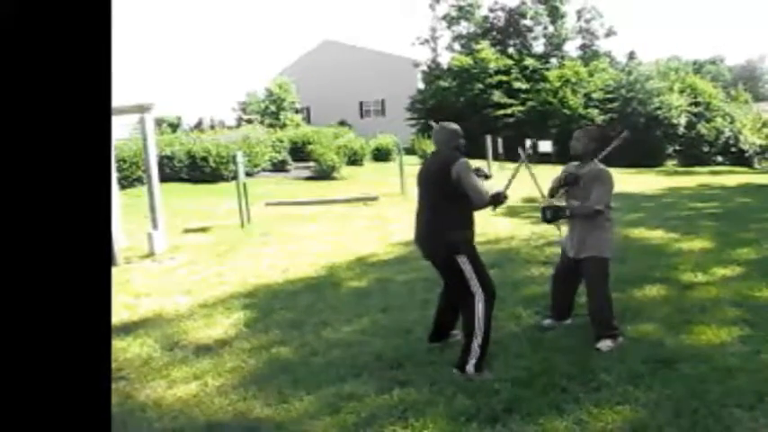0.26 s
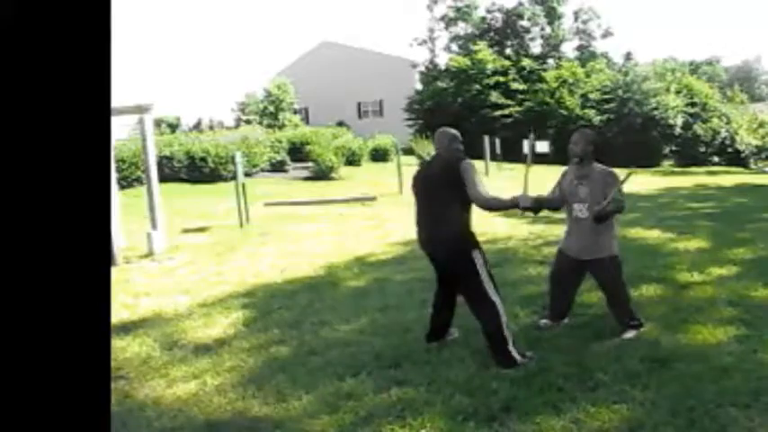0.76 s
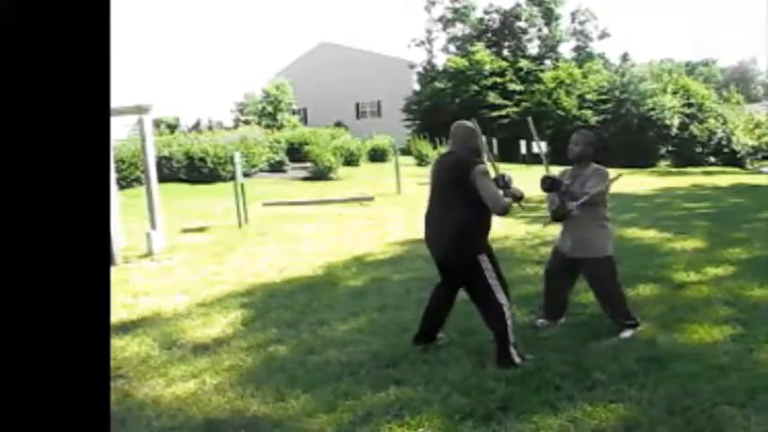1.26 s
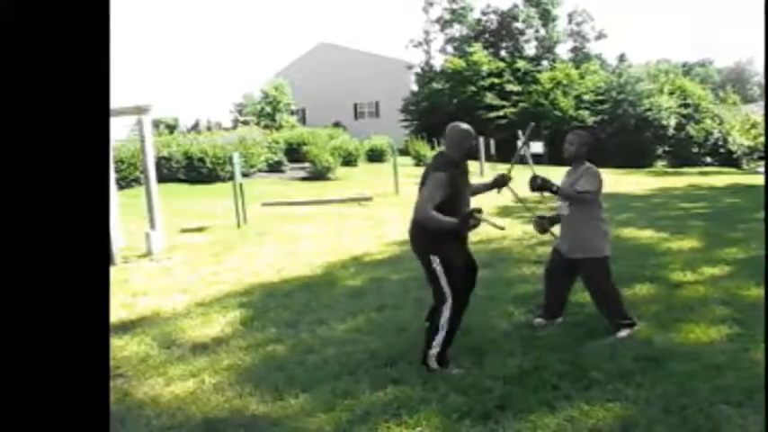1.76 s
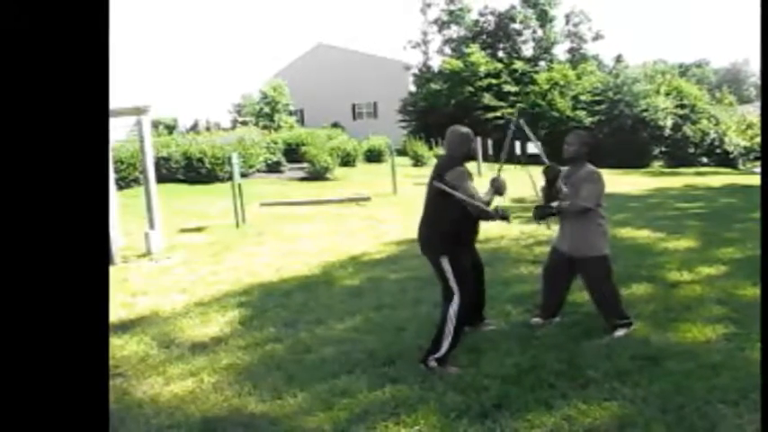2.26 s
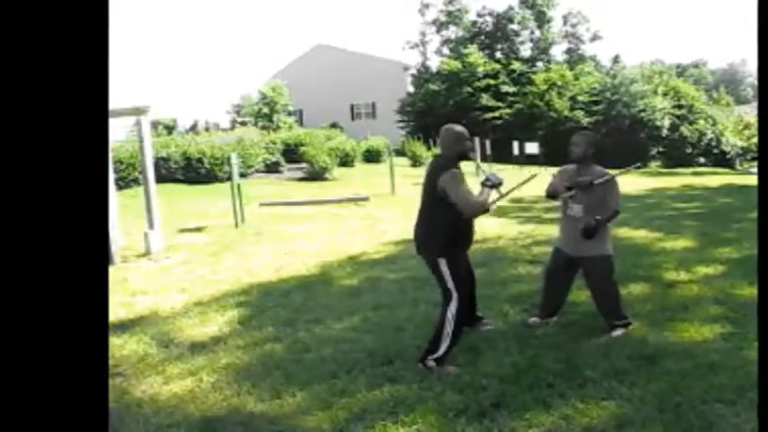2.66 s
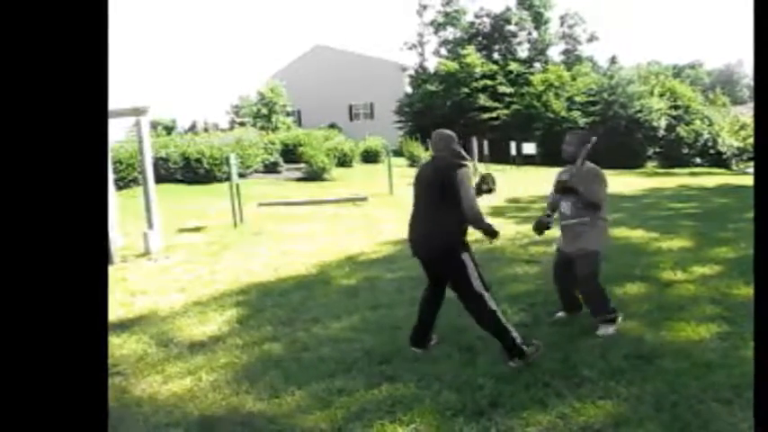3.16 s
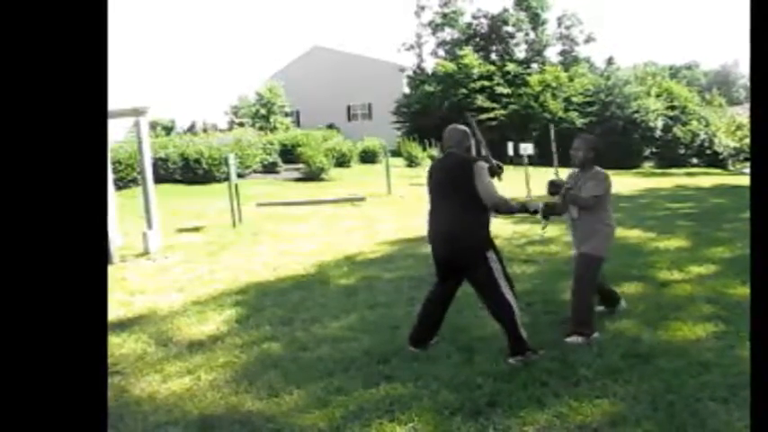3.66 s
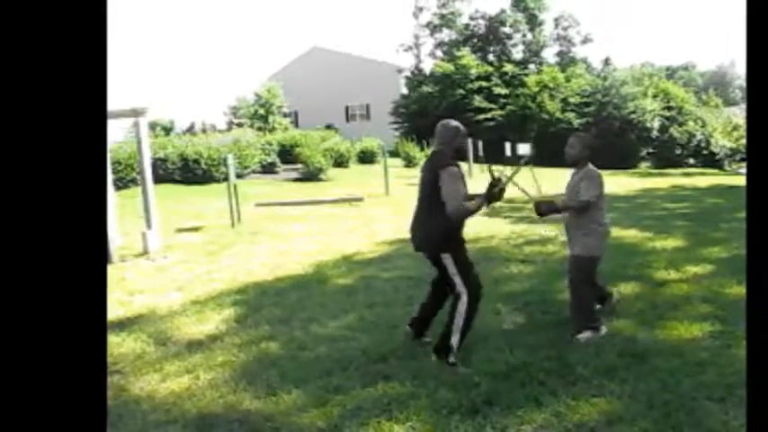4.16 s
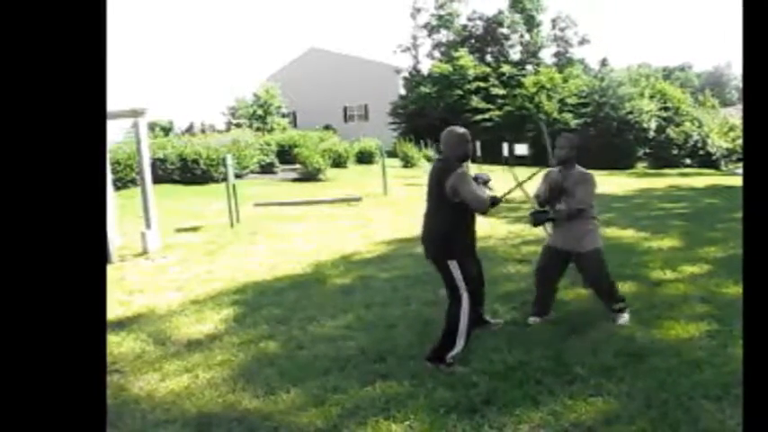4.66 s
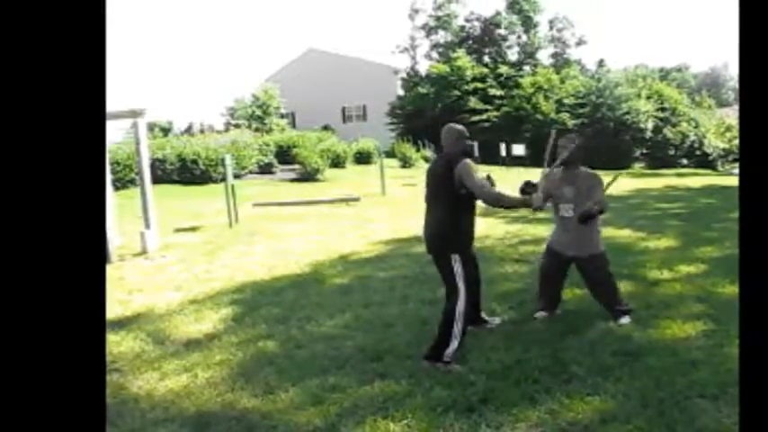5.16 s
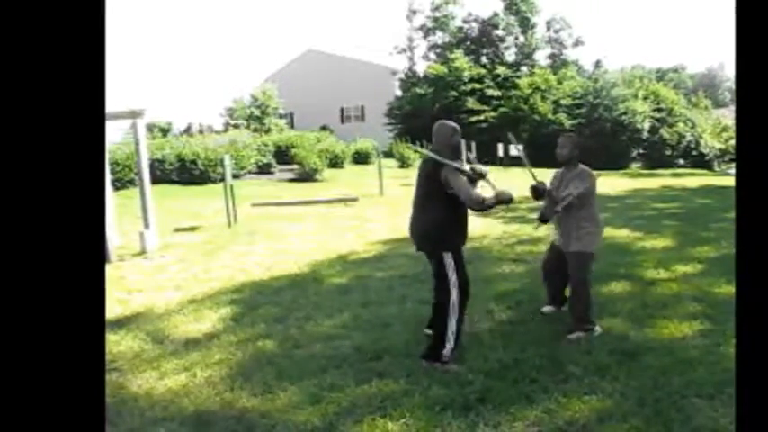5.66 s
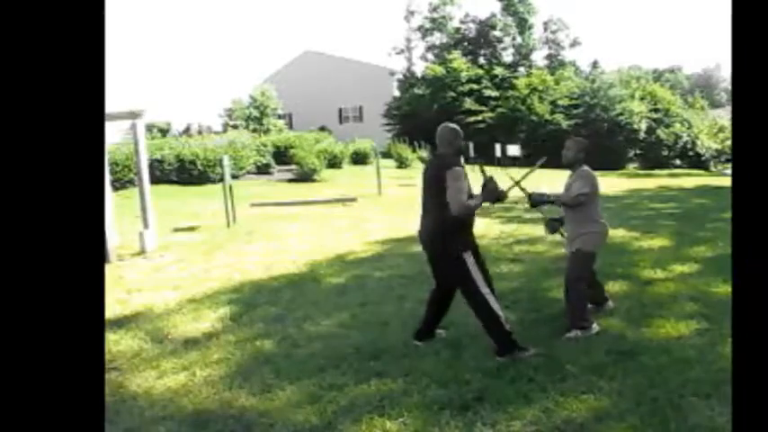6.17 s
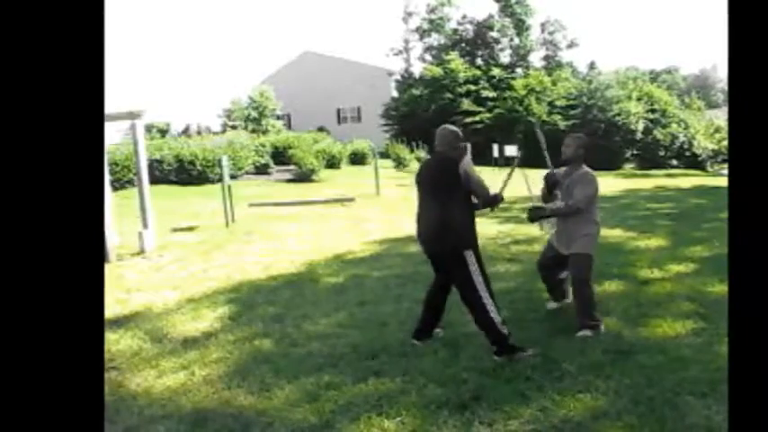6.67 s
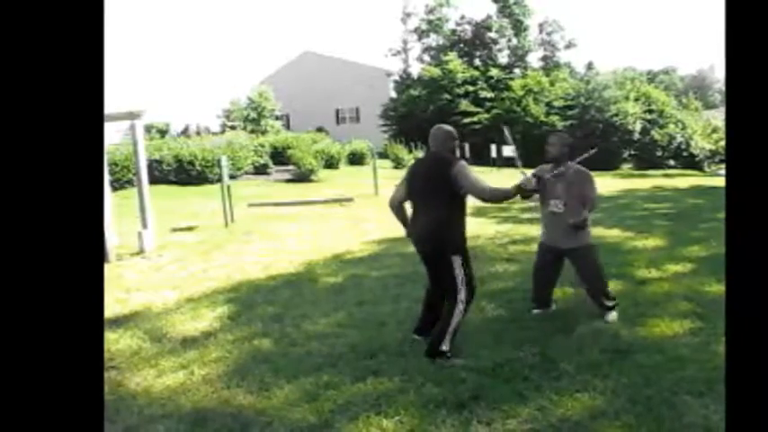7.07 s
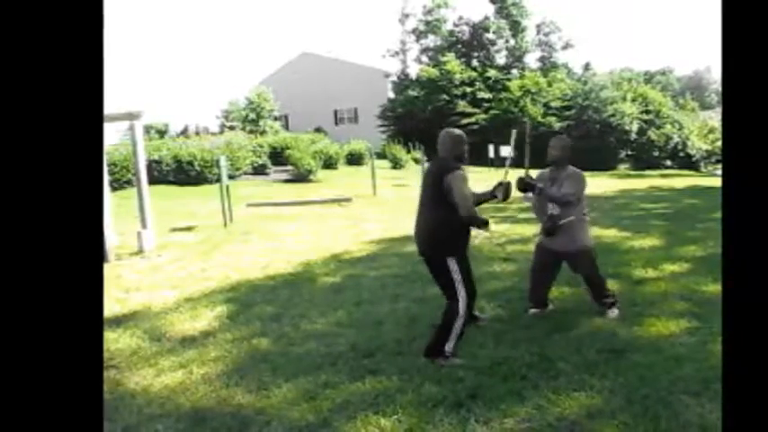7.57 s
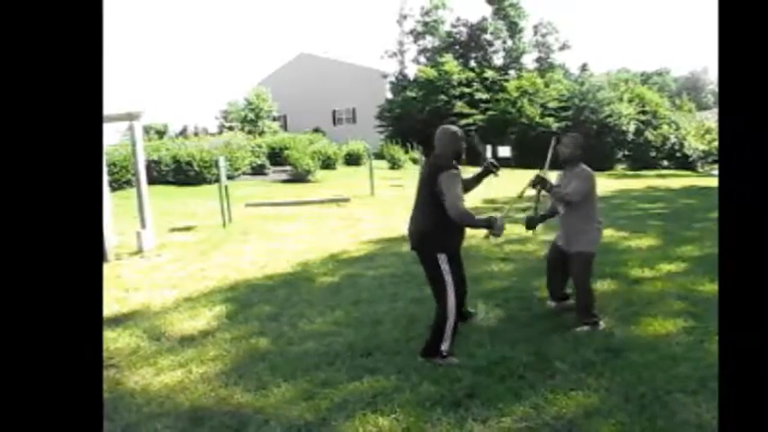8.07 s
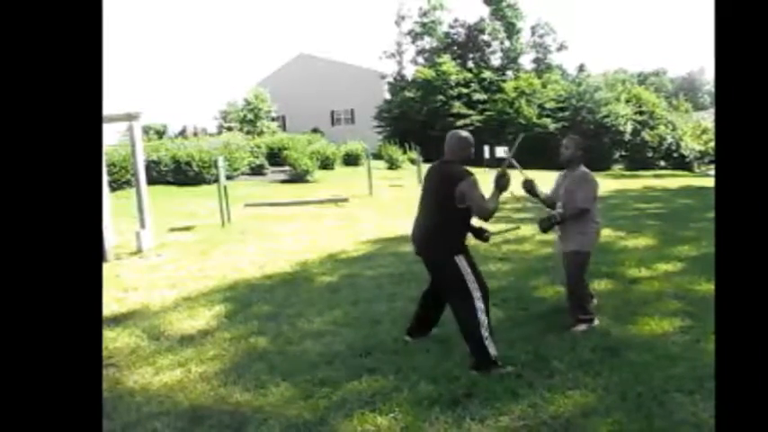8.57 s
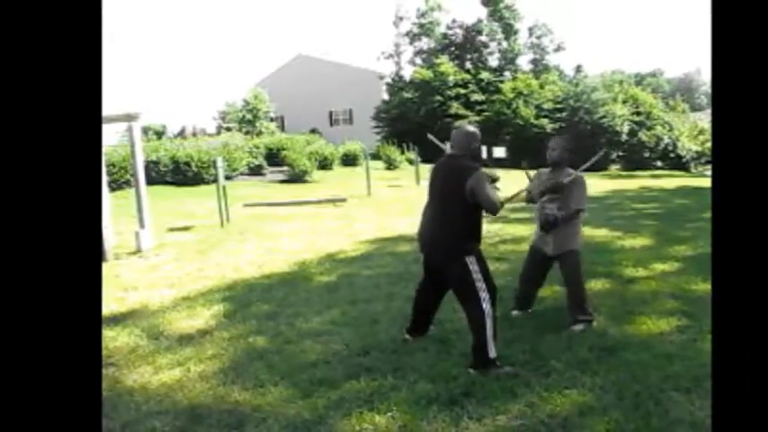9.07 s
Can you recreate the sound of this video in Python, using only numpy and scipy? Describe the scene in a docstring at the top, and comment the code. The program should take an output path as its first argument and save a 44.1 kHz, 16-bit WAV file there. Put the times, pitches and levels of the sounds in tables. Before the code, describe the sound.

Two pairs of rattan sticks knock together in a steady, slightly uneven rhythm outdoors, bright cracks over near-silent grass rustle and distant hum.

```python
"""Sharp wooden clacks come first: two pairs of rattan sticks on a lawn, some metres from a small stereo camera.
Each blow is a sum of decaying modes that bounces once and comes again off the ground.
Two walls echo it; trees and houses answer with a faint tail of shaped noise.
Behind lie noise swishes, grains of rustling feet and clothes, deep sine thumps and a wavering low drone,
then narrow-band rumble and hum, and quiet outdoor air of filtered noise."""
import sys
import numpy as np
from scipy import signal
from scipy.fft import rfft, irfft
from scipy.io import wavfile
from scipy.ndimage import uniform_filter1d, map_coordinates

SR = 44100
rng = np.random.default_rng(int(sys.argv[2]) if len(sys.argv) > 2 else 0)


def int16_out(signal):
    """Quantize to a 16-bit WAV file."""
    q = np.round(np.clip(np.atleast_2d(signal).T, -1, 1) * 32767)
    wavfile.write(sys.argv[1], SR, q.astype(np.int16))


N = 411453
T = np.arange(N) / SR  # seconds


def undb(db):
    """Amplitude factor of a level in dB."""
    return 10 ** (np.asarray(db) / 20)


def unit(x):
    """Scale to an rms of 1."""
    return x / np.sqrt(np.mean(x ** 2))


def on_log(table, hz):
    """Read a (Hz, value) table on a log-frequency axis."""
    table_hz, value = np.transpose(table)
    return np.interp(np.log(hz + 1e-9), np.log(table_hz), value)


def band(x, lo_hz, hi_hz):
    """Keep one frequency band, with gentle slopes."""
    sos = signal.butter(2, [lo_hz, hi_hz], "band", fs=SR, output="sos")
    return signal.sosfilt(sos, x)


def walk(rate):
    """Random levels held 1 / rate seconds and slewed twice, with an rms of 1."""
    hold = int(SR / rate)
    steps = np.repeat(rng.standard_normal(N // hold + 1), hold)
    slewed = uniform_filter1d(uniform_filter1d(steps, hold), hold)
    return unit(slewed[:N])


def pair(mid, side, likeness):
    """Left and right from a shared and an opposed noise; likeness 1 makes them equal."""
    c = np.clip(likeness, 0, 1)
    shared, opposed = np.sqrt(1 + c) * mid, np.sqrt(1 - c) * side
    return np.array([shared + opposed, shared - opposed]) / np.sqrt(2)


# Stick blows on the lawn, some metres from the camera. Each row: start in seconds, direct peak in dB,
# centre of the brightness in Hz, favoured ring in Hz, bass tilt in dB, treble tilt in dB,
# ground contact in ms after the first, its level in dB against the first,
# and level sent to the surroundings in dB against the direct clack.
STICK_BLOWS = [(-0.007, -7.5, 3260, 2600, -26.5, -11, 2.66, 4, 2.5),
               (0.3041, -6.5, 3360, 3000, -26.5, -19.5, 2.56, -5.5, -5),
               (0.7262, -11, 2920, 2870, -34, -19.5, 3.36, 1, 2.5),
               (1.1175, -0.5, 3330, 2840, -42, -15.5, 3.8, -5.5, -4),
               (1.486, -7, 3150, 1920, -30, -8.5, 3.43, -1.5, 4.5),
               (1.803, -2, 4190, 3237, -23, -16, 3.9, -14.5, -4.5),
               (2.2584, -1.3, 3610, 3530, -34, -20.5, 4.23, -1, -3),
               (2.592, -7, 2730, 2170, -35, -13, 4.76, -7, -4.5),
               (2.6435, -10, 2620, 2727, -39, -11, 3.5, 6.5, -1.5),
               (3.0177, -7.5, 2990, 1938, -33.5, -15.5, 3.17, 1, 3.5),
               (3.3721, -2.5, 3010, 2690, -32, -27.5, 4.36, -2, -3),
               (3.77, -4.5, 3470, 3450, -24, -19.5, 2.2, 2.8, 3.5),
               (4.0852, -1, 3170, 3910, -31.5, -8.5, 2.6, -3.5, -3),
               (4.4918, 0, 4090, 4050, -31, -21, 1.64, -11, -5),
               (4.782, -15, 2355, 2754, -22, -13, 2.86, -6, 0.5),
               (5.1802, -8, 2802, 4100, -35.5, -7.5, 3.03, 4, 6.5),
               (5.4964, -0.06, 3280, 3060, -30, -8.5, 3.85, -9.5, -0.2),
               (5.8402, 0.6, 3620, 4195, -37, -12, 2.9, -6.5, 0),
               (6.1254, -3.5, 3510, 2568, -25.5, -10, 2.4, -17, -3),
               (6.5303, -1, 4040, 5590, -36.5, -23, 2.67, -0.5, -1.5),
               (6.8067, -11.5, 2270, 1933, -33.5, -4.5, 3.46, -6, -3),
               (7.1868, -5, 3770, 4970, -26, -22.5, 2.6, -3, 3.5),
               (7.599, 0, 3300, 3480, -28, -18, 3.23, -12, -6),
               (7.9792, -4.5, 3230, 2480, -31.5, -5, 2.96, 3.5, 1.5),
               (8.285, -4.5, 3510, 3635, -33.5, -13.5, 2.3, 4, -2),
               (8.7562, -5, 3280, 3314, -32.5, -10, 4.4, -8.5, -0.5),
               (9.104, -8, 3000, 3300, -28.5, -18, 2.07, -6, -5.5)]
BOUNCE_MS, BOUNCE_SPREAD_MS = 1.0513, .4
BOUNCE_DB, BOUNCE_SPREAD_DB = -3, 2.5  # against the first contact
SIDEWAYS_S = .003  # extra decay: away from the camera a ring is shorter and less pitched
PAN_DB = -2.5  # left minus right, in the middle frequencies
LEFT_LAG_SAMPLES = 0.9


def sticks():
    """Wooden blows radiate straight to the camera and sideways to walls, trees and houses."""
    lead = SR // 10  # room for a blow that starts before time zero
    direct, dry = np.zeros((2, N + 2 * lead)), np.zeros(N + 2 * lead)
    chance = rng.uniform(-1.002, 1, size=(len(STICK_BLOWS), 2))
    for row, (late, hard) in zip(STICK_BLOWS, chance):
        s, db, centre, ring, bass, treble, ground_ms, ground_db, sent_db = row
        # the bounce is softer and the grass swallows treble (last value, dB per octave)
        bounce = (BOUNCE_MS + BOUNCE_SPREAD_MS * late, BOUNCE_DB + BOUNCE_SPREAD_DB * hard, 2.2)
        contacts = [(0, 0, 0), bounce, (ground_ms, ground_db, 5.0)]
        clack, first = undb(db) * np.array(blow(centre, ring, bass, treble, contacts))
        i = lead + int(s * SR)
        short = first * np.exp(-T[:len(first)] / SIDEWAYS_S)
        dry[i:i + len(clack)] += unit(short) * np.std(first) * undb(sent_db)
        # the camera body shades the ports mainly in the middle frequencies
        shading = undb([[PAN_DB / 2], [-PAN_DB / 2]]) - 1
        direct[:, i:i + len(clack)] += clack + band(clack, 1600, 7000) * shading
    ahead = direct.mean(axis=0)
    # the right port hears the sticks first
    late_places = np.arange(len(dry)) - LEFT_LAG_SAMPLES
    direct[0] = map_coordinates(direct[0], [late_places], order=3)
    return (direct + surroundings(dry, ahead))[:, lead:lead + N]


# Modes of a rattan stick, before the chances and tilts of each blow.
# Each row: frequency in Hz, relative level in dB, time to fall 60 dB in seconds.
STICK_MODES = [(355, 1.5, 0.025), (477, 2, 0.027), (697, 8.5, 0.014), (972, 0, 0.065), (1297, -18.5, 0.11),
               (1580, -12.5, 0.04), (1771, -13, .02), (2087, -0.5, 0.025), (2420, -3.5, 0.022),
               (2774, 3, 0.016), (3190, 1.5, 0.0083), (3466, 0.5, 0.02), (3847, -1, 0.011),
               (4101, 2, 0.018), (4500, -7, .014), (4822, 0.5, 0.016), (5200, -0.5, 0.0059),
               (5636, 0.5, 0.016), (6224, 3.5, 0.013), (6987, 4.5, 0.01), (7690, 3, .008), (8180, 1, 0.013),
               (9260, 3.5, 0.008), (9940, 5, 0.0063), (10650, -2.5, 0.0073), (12300, -3.5, .006),
               (13700, -2, .005), (15000, -10, 0.0071)]


def blow(centre_hz, ring_hz, bass_db, treble_db, contacts):
    """One clack of peak 1, and its first contact at equal power: each contact cracks and rings both sticks."""
    hz, db, t60 = np.transpose(STICK_MODES)
    octave = np.log2(hz / 3200)
    db = db + bass_db * np.clip(np.log2(1500 / hz) / 0.57, 0, 1)
    db = db + treble_db * np.clip(np.log2(hz / 5000) / 0.59, 0, 1)
    db = db + 17.0 * np.log2(centre_hz / 3200) * np.clip(octave, -1, 1)  # harder contact, brighter
    hz, db, t60 = (np.tile(v, 2)[:, None] for v in (hz, db, t60))  # two sticks
    hz = hz * (1 + 0.033 * rng.standard_normal(hz.shape))  # no two sticks, no two grips alike
    loudest = np.argmin(abs(hz - ring_hz))  # the striking point favours one mode
    hz[loudest], db[loudest] = ring_hz, db[loudest] + 8.5
    low = hz[:, 0] < 1150
    t, parts = np.arange(2048) / SR, []
    for ms, contact_db, dull_db in contacts:
        dulling_db = dull_db * np.maximum(np.log2(hz / 3200), 0)
        gain = undb(db + 2.4 * rng.standard_normal(hz.shape) - dulling_db)
        age = np.maximum(t - ms / 1000, 0)
        turn = 2 * np.pi * (hz * age + 0.12 * rng.standard_normal(hz.shape))
        fade = np.exp(-np.log(1000) * age / t60) + np.exp(-age / 0.0003)  # ring plus crack
        onset = np.minimum(age / 0.00027, 1)
        modes = undb(contact_db) * gain * fade * np.sin(turn) * onset
        # a thin stick radiates little below each family of modes
        low_ring = band(band(modes[low].sum(axis=0), 300, 4600), 340, 6600)
        high_ring = band(band(modes[~low].sum(axis=0), 1300, 22000), 650, 19000)
        parts.append(low_ring + high_ring)
    clack = sum(parts)
    peak = abs(clack).max()
    return clack / peak, unit(parts[0]) * np.std(clack) / peak


# Tail from trees and houses around the lawn, before chance and a common 20 dB cut.
# Each row: seconds after the blow, relative level in dB.
TREE_AND_HOUSE_TAIL = [(.008, -70), (.02, -38), (0.046, -34), (0.068, -40.5), (.12, -43.5), (0.202, -46),
                       (.26, -51.5), (.32, -64), (.45, -68.5), (.8, -85)]
# Walls beyond the lawn. Each holds: echo delay in seconds, echo level in dB, left minus right in dB.
NEAR_WALL_ECHO = (0.0516, -44, 27.5)
FAR_WALL_ECHO = (0.2603, -46.5, -7.5)


def surroundings(dry, ahead):
    """Patchy scatter and a near wall answer the sideways sound; a far wall returns a dull clack."""
    t = np.arange(int(.8 * SR)) / SR
    s, db = np.transpose(TREE_AND_HOUSE_TAIL)
    mid, side = rng.standard_normal((2, len(t)))
    tail_db = np.interp(t, s, db, left=-200) + 2.0 * walk(60)[:len(t)] - 20.0
    reply = pair(mid, side, 0.12) * undb(tail_db)
    dull = band(reply, 200, 4300)
    reply = dull + (reply - dull) * np.exp(-t / .07)  # air and leaves take the treble first
    dry = band(dry, 800, 9000)
    scatter = signal.fftconvolve(dry[None], reply, axes=1)[:, :len(dry)]
    dull_clack = band(band(ahead, 900, 3200), 600, 4000)
    return scatter + wall(dry, *NEAR_WALL_ECHO) + wall(dull_clack, *FAR_WALL_ECHO)


def wall(line, delay, echo_db, pan_db):
    """A wall sends back one echo, slightly smeared by a short decaying noise."""
    reply = np.zeros((2, int(delay * SR) + 89))
    reply[:, -89] = undb(echo_db + np.array([pan_db, -pan_db]) / 2)
    smear = rng.standard_normal((2, 88)) * np.exp(-np.arange(88) / 30)
    reply[:, -88:] = undb(echo_db - 7.5) * smear
    return signal.fftconvolve(line[None], reply, axes=1)[:, :len(line)]


# Short swishes and scuffs of sticks, hands and feet, as heard at the camera.
# Each row: middle in seconds, length in seconds, centre in Hz, level before the swell in dB.
SWISH_EVENTS = [(.64, 0.013, 3500, -60), (1.333, 0.016, 2060, -52), (1.472, 0.036, 3060, -51.5),
                (1.68, 0.0068, 2500, -47), (2.975, 0.012, 2446, -50), (3.232, .015, 4020, -55),
                (3.366, 0.018, 4630, -49.5), (3.982, 0.044, 1800, -54), (4.074, 0.016, 3430, -58),
                (4.205, 0.027, 3040, -51), (4.217, 0.0068, 2580, -40), (4.224, .03, 1730, -47.5),
                (4.479, 0.012, 1532, -45), (5.025, 0.04, 4440, -74), (5.224, 0.011, 4180, -46.5),
                (7.033, 0.017, 4250, -54.5), (7.043, 0.015, 1900, -55.5), (7.184, 0.021, 3050, -54),
                (7.869, .012, 3500, -56), (7.98, 0.015, 2470, -60), (8.547, .014, 2200, -53)]


def swishes():
    """Soft puffs of noise, somewhat over an octave wide, swell and fade."""
    out = np.zeros((2, N))
    for s, length, hz, db in SWISH_EVENTS:
        i, j = int((s - 2 * length) * SR), int((s + 2 * length) * SR)
        mid, side = rng.standard_normal((2, SR // 4))[:, :j - i]
        puff = unit(band(pair(mid, side, 0.87), hz / 1.7, hz * 1.52))
        swell = np.exp(-(2 * (T[i:j] - s) / length) ** 2)
        out[:, i:j] += undb(db) * puff * swell
    return out


# Feet in the grass and clothes, as heard at the camera.
# Each row: time in seconds, hiss level in dB, body level in dB.
RUSTLE_LEVELS = [(0.0, -85, -70), (0.52, -77, -67), (1.19, -81.5, -70.5), (1.35, -73.5, -64),
                 (1.77, -72, -62), (2.05, -86, -67), (2.31, -79.5, -78.5), (2.44, -86, -66.5),
                 (3.06, -66.5, -59.5), (3.77, -87.5, -64.5), (4.03, -69.5, -61), (4.21, -70, -59),
                 (5.02, -87, -66.5), (5.38, -74.5, -59.5), (6.0, -70, -60.5), (6.31, -81, -62.5),
                 (6.57, -89, -70.5), (6.73, -74, -64), (6.99, -73, -67.5), (7.61, -85, -66),
                 (8.39, -69, -61), (8.58, -75, -65.5), (9.07, -81.5, -63.5), (9.33, -80.5, -65)]


def rustle():
    """Dense tiny grains of uneven size: a bright hiss and a duller body."""
    s, hiss_db, body_db = np.transpose(RUSTLE_LEVELS)
    size_db = 3.0 * np.minimum(rng.exponential(size=N), 5.0) + 3.1 * walk(30)
    grains = rng.standard_normal((4, N)) * undb(size_db)
    hiss = unit(band(pair(grains[0], grains[1], 0.64), 5500, 13000))
    body = unit(band(pair(grains[2], grains[3], 0.33), 400, 4300))
    return hiss * undb(np.interp(T, s, hiss_db)) + body * undb(np.interp(T, s, body_db))


# Soft deep thumps, perhaps footfalls on the turf.
# Each row: middle in seconds, rms level at the middle in dB, pitch at the middle in Hz.
THUMP_EVENTS = [(1.96, -66, 69.4), (2.27, -65, 63), (2.43, -72, 68), (2.6, -62, 65), (2.84, -61, 63.5),
                (3.3, -73, 80), (3.585, -58, 70), (3.721, -59, 63), (4.03, -69.5, 64.5), (4.86, -58, 67.2),
                (5.09, -64, 66.5), (5.2, -64, 78), (5.31, -58, 71), (5.47, -64, 68.5), (5.58, -61.5, 69),
                (5.86, -60.5, 64.2), (6.04, -58, 62.2), (6.24, -76, 59.4), (6.469, -68, 69),
                (7.155, -60.5, 66), (7.3, -68, 69.3), (8.19, -60.5, 68), (8.33, -60, 65.4), (8.47, -68, 64),
                (8.63, -70.5, 62.6), (9.02, -74.5, 77.9)]
THUMP_S, THUMP_SAG_HZ_PER_S = 0.074, 70


def thumps():
    """A few sine cycles each, swelling and fading while the pitch sags."""
    out = np.zeros(N)
    for (s, db, hz), turn in zip(THUMP_EVENTS, rng.random(len(THUMP_EVENTS))):
        near = slice(int((s - 2 * THUMP_S) * SR), int((s + 2 * THUMP_S) * SR))
        t = T[near] - s
        wave = np.sin(2 * np.pi * (hz * t - THUMP_SAG_HZ_PER_S * t ** 2 / 2 + turn))
        swell = np.exp(-(2 * t / THUMP_S) ** 2 / 2)
        out[near] += np.sqrt(2) * undb(db) * wave * swell
    return out


# Far low drone, before its wavering. Each row: time in seconds, rms level in dB, pitch in Hz.
DRONE_PATH = [(0, -96, 79), (.55, -82.5, 80), (1.5, -74.5, 77.2), (1.85, -75.5, 79.1), (2.1, -78, 66),
              (4.3, -77.5, 69.2), (4.65, -92, 70), (5.0, -71.5, 64.2), (6.3, -69, 61.5), (6.7, -87, 65.8),
              (7.5, -76.5, 74.7), (8.7, -81.5, 64.6), (9.33, -94, 69.6)]


def drone():
    """A far low sine tone wavers in pitch and level."""
    s, db, hz = np.transpose(DRONE_PATH)
    pitch_hz = np.interp(T, s, hz) * (1 + 0.055 * walk(18))
    turns = np.cumsum(pitch_hz) / SR
    level_db = np.interp(T, s, db) + 3.0 * walk(12)
    return np.sqrt(2) * np.sin(2 * np.pi * turns) * undb(level_db)


# Deep rumble that comes and goes behind the lawn. Each row: time in seconds, level in dB.
RUMBLE_LEVELS = [(0.0, -83), (0.13, -104), (4.16, -75.5), (4.34, -87.5), (6.37, -84.5), (6.73, -99),
                 (7.46, -72.5), (7.85, -92), (7.98, -75), (9.33, -88.5)]


def rumble():
    """Narrow noise at the bottom of hearing rises and falls."""
    s, db = np.transpose(RUMBLE_LEVELS)
    return unit(band(rng.standard_normal(N), 30, 45)) * undb(np.interp(T, s, db))


# Far machinery. Each row: centre in Hz, width in Hz, level in dB.
HUM_LINES = [(231.2, 8, -79), (112, 8.4, -80.5)]


def hum():
    """Far machinery hums in wavering lines, each a very narrow band of noise."""
    out = np.zeros(N)
    for hz, width, db in HUM_LINES:
        line = band(rng.standard_normal(N), hz - width / 2, hz + width / 2)
        out += unit(line) * undb(db)
    return out


# Open air around the camera. Each row: frequency in Hz, relative density in dB per Hz.
AIR_SPECTRUM = [(21, -35), (36, -5.5), (86, 2), (175, 1.5), (232, 0.5), (277, -1), (428, -3.5), (789, 2),
                (1350, -4.5), (3460, -7.5), (10900, -38.5), (14800, -28.5), (16000, -44)]
# How alike the two ports hear the air. Each row: frequency in Hz, left-right likeness from 0 to 1.
AIR_PORT_LIKENESS = [(60, 0.67), (290, 1), (640, 0.3), (1400, 0.6), (3100, 0.9), (7000, 0.8)]
AIR_DB, AIR_SWELL_DB = -65.5, 1.2  # middle level, rms size of its slow swell


def air():
    """Outdoor noise swells slightly, its left-right likeness varying with frequency."""
    hz = np.fft.rfftfreq(N, 1 / SR)
    mid, side = rfft(rng.standard_normal((2, N)))
    spectrum = pair(mid, side, on_log(AIR_PORT_LIKENESS, hz)) * undb(on_log(AIR_SPECTRUM, hz))
    return unit(irfft(spectrum, N)) * undb(AIR_DB + AIR_SWELL_DB * walk(0.76))


def scene():
    """The sticks and their echoes, then the small movements, then the distance."""
    near = sticks() + swishes() + rustle() + thumps()
    return near + drone() + rumble() + hum() + air()


def record(dry):
    """The loudest peaks are clipped and the top is cut steeply above 16.5 kHz."""
    top = signal.ellip(8, .2, 70, 16500, fs=SR, output="sos")
    return signal.sosfilt(top, np.clip(dry, -.95, .95))


dry = scene()
out = record(dry)
int16_out(out)
```